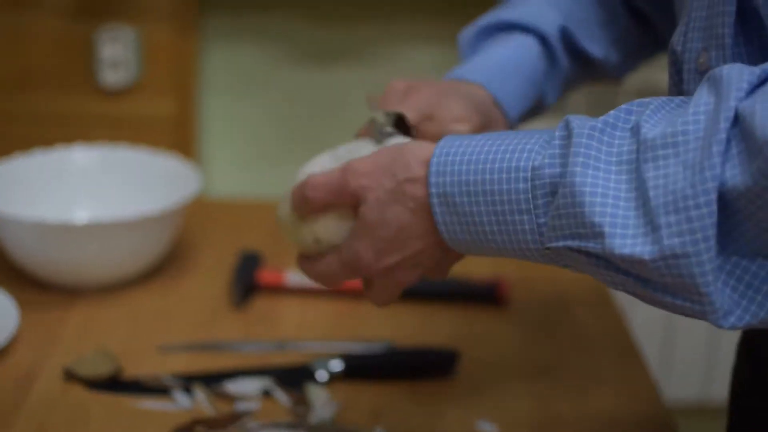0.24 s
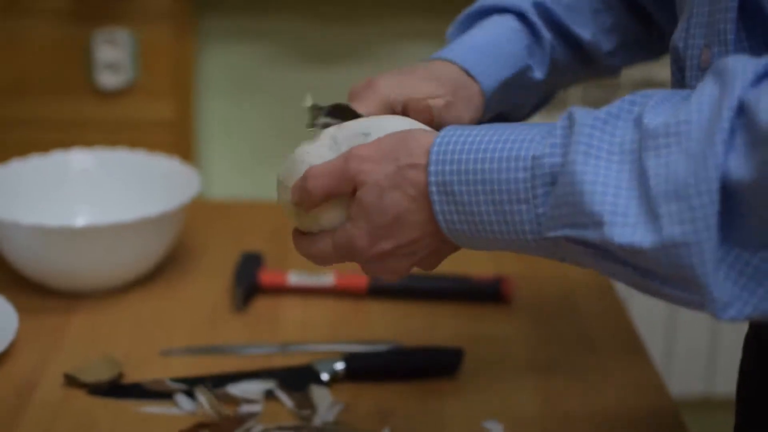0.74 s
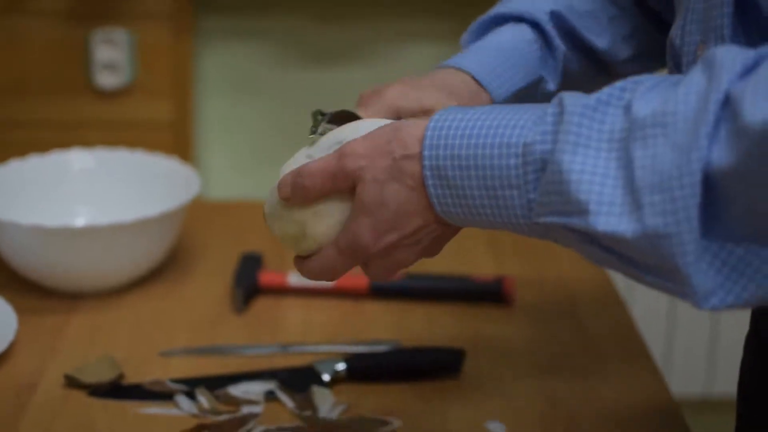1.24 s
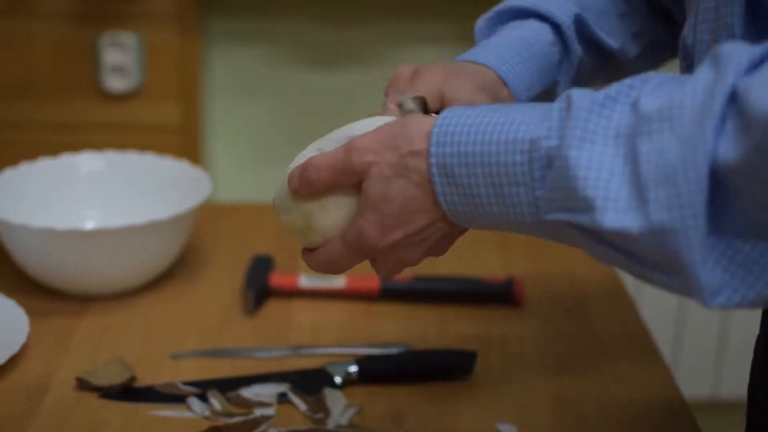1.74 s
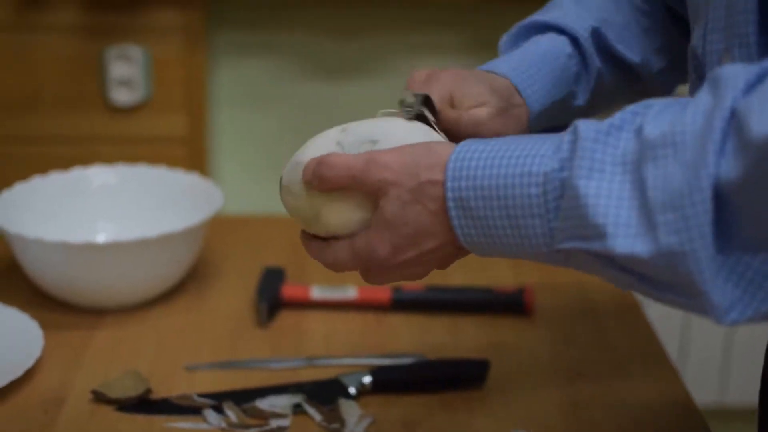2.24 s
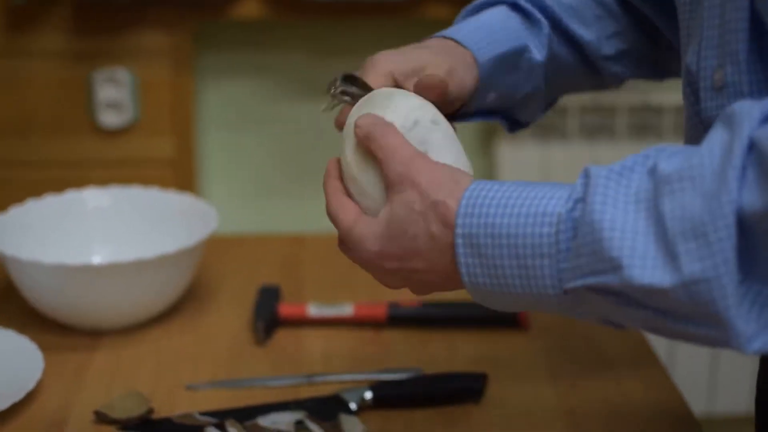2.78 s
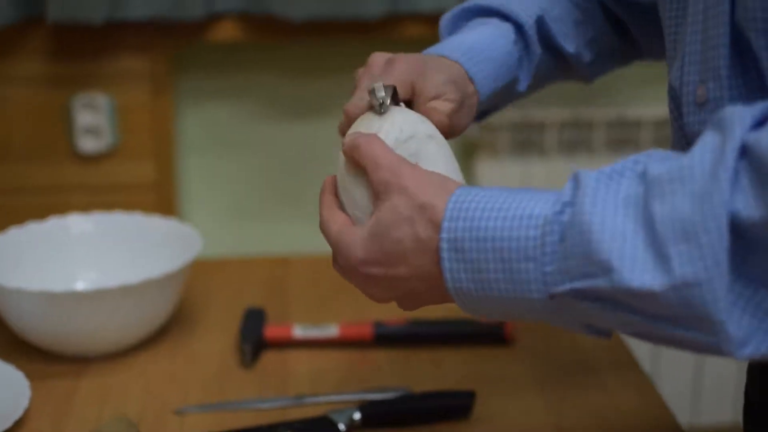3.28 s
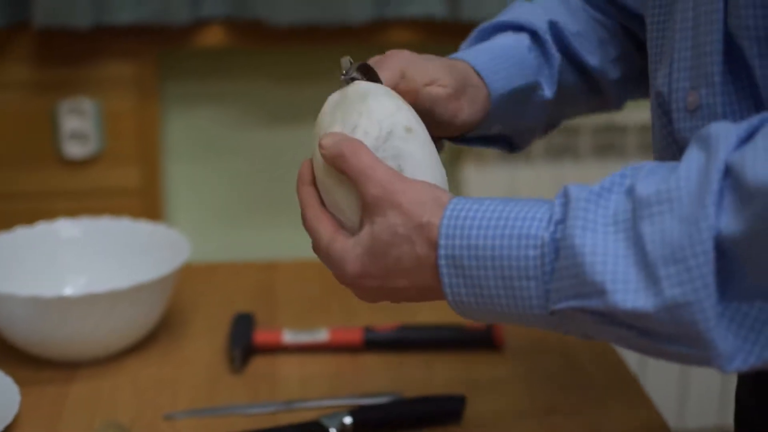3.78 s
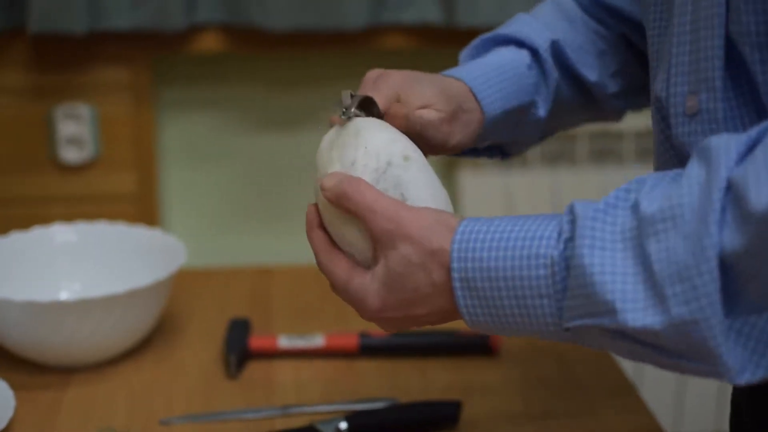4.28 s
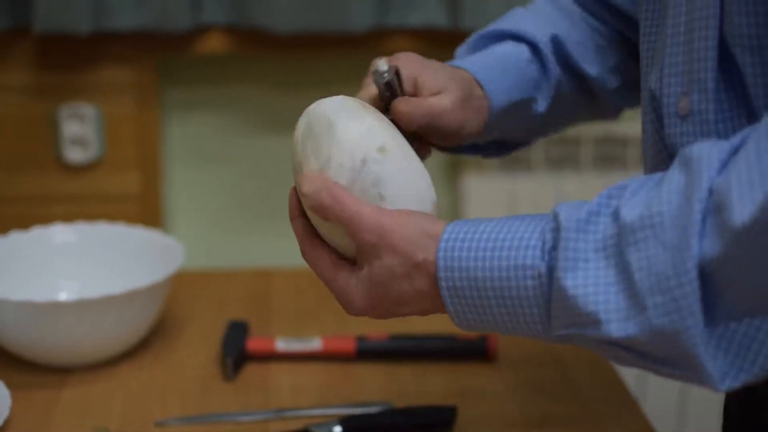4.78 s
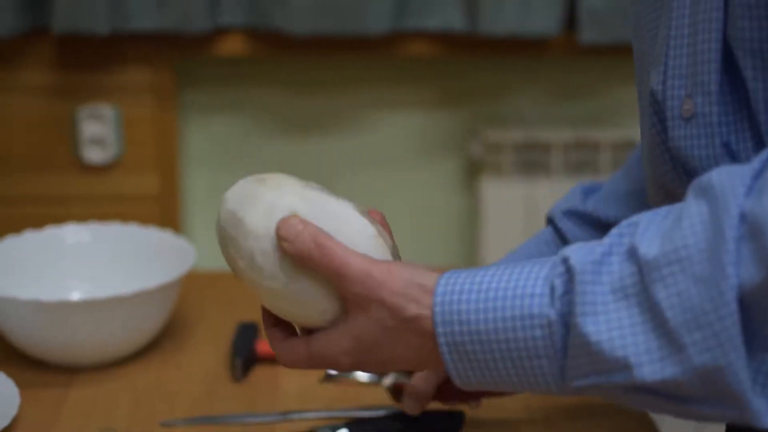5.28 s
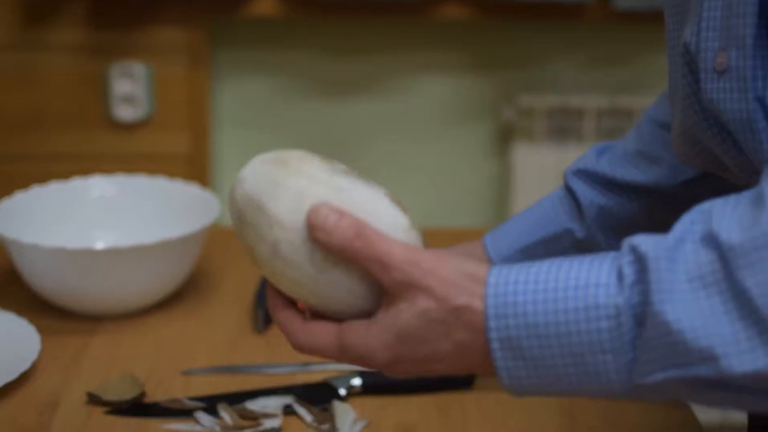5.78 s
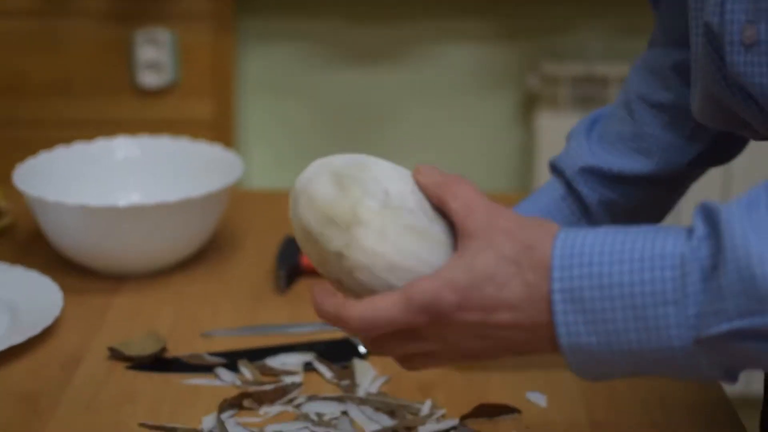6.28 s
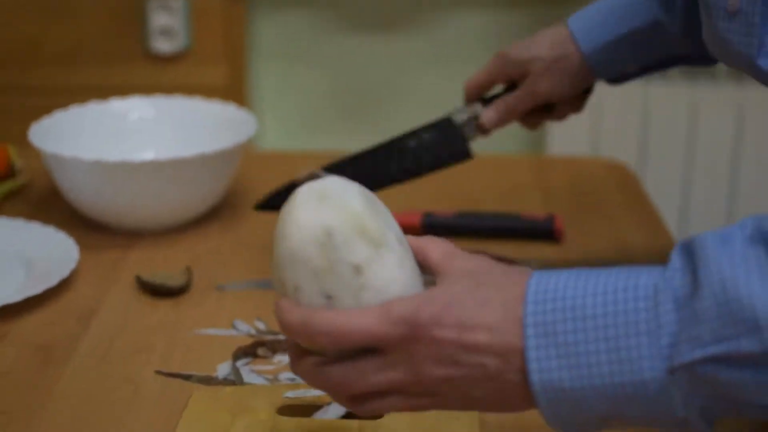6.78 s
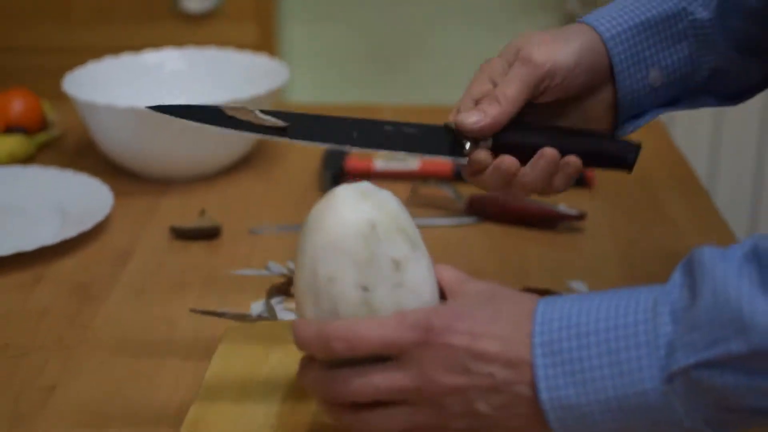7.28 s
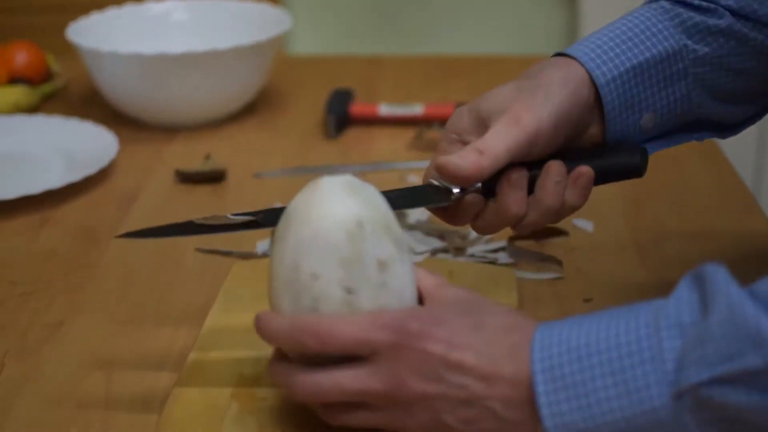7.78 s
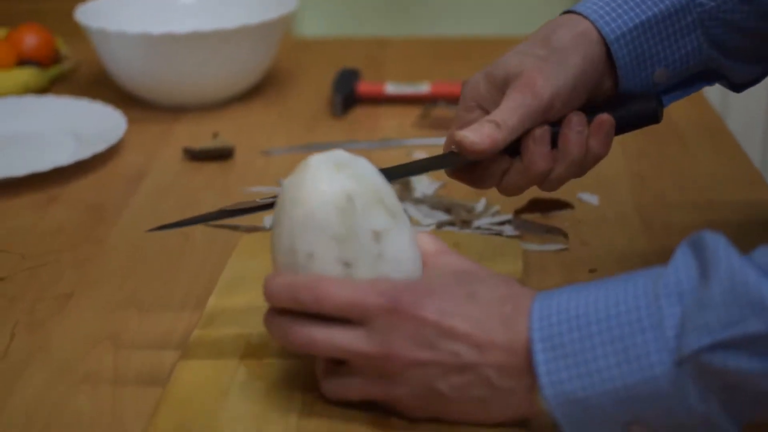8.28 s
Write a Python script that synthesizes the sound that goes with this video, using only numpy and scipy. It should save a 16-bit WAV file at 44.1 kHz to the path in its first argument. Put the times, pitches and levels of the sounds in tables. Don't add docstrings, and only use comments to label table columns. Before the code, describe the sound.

Close to the hands in a lively tiled kitchen, a swivel peeler shaves a coconut in short, uneven snicks, its loose blade ticking and jingling over the nut's hollow knock. After a brief lull, the tool is put down with hard wooden knocks, metallic clinks and a rough drag. Near quiet follows, then small knife touches over faint room air and refrigerator hum.

```python
import sys
import numpy as np
from scipy import signal
from scipy.io import wavfile

SR = 44100
rng = np.random.default_rng(int(sys.argv[2]) if len(sys.argv) > 2 else 0)


def voltage_ratio(decibels):
    exponent = np.asarray(decibels, float) / 20
    return 10 ** exponent


def master_out(mix):
    frames = np.transpose(np.atleast_2d(mix))
    ceiling = np.clip(frames, -1, 1)
    pcm = np.round(ceiling * 32767).astype(np.int16)
    wavfile.write(sys.argv[1], SR, pcm)


N = 376173

# start_s, level_db (bite), flesh_db (depth), loose_db (blade), length_s (rasp)
CUT_STROKES = [(0.0464, -34, -10.5, -6, 0.011), (0.1176, -18, -2.5, -4.5, 0.0054),
               (0.4544, -42.5, 3.5, -22, 0.022), (0.5394, -41.5, -8, -5, 0.019),
               (0.636, -27, -13.5, -5, 0.0074), (0.9403, -40, -1.5, -5.5, 0.037),
               (1.2254, -27.5, -0.5, -8.5, 0.019), (1.715, -20.5, -5.5, -8, 0.016),
               (2.0587, -27, -8.5, -7.5, 0.007), (2.2777, -40, -8, 2, 0.014),
               (2.6319, -41, -18, -7.5, 0.015), (2.8355, -44.5, 6, 2, 0.0091),
               (2.9357, -29, -6.5, 0.5, 0.012), (3.1867, -22, -1.5, -10.5, 0.023),
               (3.4181, -36, -9.5, 0.5, 0.055), (3.7035, -21.5, -9.5, -2, 0.0077),
               (4.0133, -36.5, -9, -7, 0.016), (4.1434, -34, -4.5, -1, 0.025),
               (4.7686, -18.5, -1, 0.5, 0.0042), (4.9337, -44.5, 4.5, 3.5, 0.034)]
CUT_THUD_DB, CUT_THUD_FOLLOWS = -11, 1.2
# start_s, level_db (rasp), flesh_db (depth), loose_db (blade), length_s (rasp)
BLADE_SLIDES = [(0.305, -41.5, -4.5, -4, 0.031), (0.443, -46, 0, -25, 0.015), (0.474, -37, -18, -4, 0.016),
                (0.747, -51, 7.5, 1.5, 0.17), (1.4055, -44, 5, 2.5, 0.037), (1.845, -35, -5.5, -2.5, 0.01),
                (2.12, -43.5, 0.5, -1.5, 0.049), (2.9134, -35.5, 2, -5, 0.0073),
                (3.381, -50.5, 13, 3, 0.025), (3.743, -40.5, 6, -23, 0.02), (3.9, -30.5, -6.5, 0, 0.025),
                (4.419, -31, -3.5, -3.5, 0.018), (4.59, -55, -6, -2, 0.02), (5.912, -35, 3, -15, 0.017),
                (7.108, -46.5, 3.8, -12, 0.078), (8.443, -58, 15, -20, 0.052)]
SLIDE_THUD_DB, SLIDE_THUD_FOLLOWS = -11, 1.0
# start_s, level_db, loose_db (blade)
BLADE_TICKS = [(0.212, -51, 3), (0.6427, -65, -6), (1.1, -52.5, 5), (1.1265, -42, 1.5), (1.58, -49.5, -5),
               (1.6428, -42.5, -1), (1.938, -47.5, 3), (2.431, -61, 5), (2.482, -61, 14.5),
               (3.051, -41.5, -0.5), (3.6401, -49, 0), (4.6548, -43.5, 1.5), (4.7045, -48, -2),
               (4.776, -35, 9.5), (4.5965, -53.5, 3.5), (0.031, -48, -6), (0.0568, -48, -7),
               (1.721, -48, -11), (2.898, -47, -4), (3.3952, -56, 5), (1.403, -50, -2), (1.417, -44, 3),
               (5.2773, -44.5, -2.5)]
TICK_THUD_DB, TICK_FLESH_DB, TICK_S = -17, -5.5, 0.015
# start_s, level_db (thud)
NUT_JOLTS = [
    (0.7903, -35.5),
    (3.1872, -29.5),
]
JOLT_EDGE_DB, JOLT_FLESH_DB, JOLT_JINGLE_DB, JOLT_S = -20, -15, 9, 0.0098
# start_s, level_db, thud_db, ring_db (blade)
KNIFE_TOUCHES = [
    (7.883, -34.5, -39, -12.5),
    (8.102, -34, -1.5, -32),
    (8.494, -35.5, -2.5, -32.5),
]
KNIFE_FLESH_DB, KNIFE_S = 0, 0.021

# pitch_hz, width_hz, level_db
COCONUT_MODES = [(414, 810, -6.5), (560, 310, 0), (740, 130, -6.5), (940, 150, 1.5), (1037, 240, 8.5)]
# pitch_hz, width_hz, level_db
FLESH_MODES = [(1350, 47, -5), (1710, 420, 3.5), (2040, 1200, 4), (3050, 400, -5.5)]
# pitch_hz, width_hz, level_db
EDGE_MODES = [(3170, 2450, 4), (3980, 2100, 4), (5440, 1200, -9), (6230, 650, -0.5)]
# pitch_hz, width_hz, level_db
BLADE_MODES = [(7140, 1100, 0.5), (8300, 160, -10), (9290, 780, 6), (10200, 280, -0.5), (11000, 290, -5),
               (12400, 590, -17), (13500, 1100, -5.5), (15000, 1200, -4)]
# pitch_hz, width_hz, level_db
JINGLE_MODES = [(3920, 50, -19), (6860, 31, -0.5), (7570, 200, -35), (8580, 230, 2.5), (9640, 370, 9),
                (10000, 270, -15), (10900, 160, -7), (12000, 100, 5.5), (12800, 110, -2.5)]
BODY_VARY_DB, METAL_VARY_DB = 1.6, 3.5

# start_s, level_db, length_s (under 0.002 counts as 0.002)
BLADE_RATTLES = [(0.474, -46, -0.15), (0.54, -50, -0.8), (1.127, -50, -0.3), (1.415, -39, -0.15),
                 (2.28, -52, -0.05), (2.94, -51, .03), (3.42, -38, .09), (3.905, -43, .06),
                 (4.015, -49.5, .03), (4.145, -47, -0.1), (4.77, -40, 0.1)]
# pitch_hz, width_hz, level_db
PIVOT_MODES = [(7070, 53, -4), (7800, 33, -12), (8350, 53, -17), (9350, 150, 0), (9630, 50, -5),
               (10100, 42, -11), (11100, 50, -4.5), (11700, 39, -3), (12000, 51, -7), (13000, 74, 0)]

# start_s, level_db, pitch_hz, length_s
HAND_THUMPS = [(0.453, -42, 750, 0.003), (0.787, -41.5, 179, 0.028), (0.787, -32, 330, 0.01),
               (.79, -30.5, 605, 0.017), (2.835, -48, 277, 0.015), (2.835, -40.5, 2220, 0.005),
               (3.186, -54, 147, 0.021), (3.185, -40, 327, 0.015), (3.186, -35.5, 610, 0.03),
               (3.749, -55.5, 180, 0.053), (3.745, -48.5, 495, 0.035), (5.681, -73, 64, 0.017),
               (3.5, -54, 920, 0.026), (5.778, -54.5, 374, 0.22), (6.018, -47, 151, 0.026),
               (6.212, -36, 283, 0.028), (6.272, -21.5, 744, 0.0053), (3.905, -48, 4050, 0.037),
               (6.214, -48.5, 127, 0.036), (2.8, -66, 45, .01), (0.788, -42, 820, .02),
               (0.119, -48.5, 610, .008), (2.634, -56, 750, 0.028), (4.77, -44.5, 600, 0.011),
               (3.418, -45, 4030, 0.048), (4.6, -50, 800, .02), (6.4, -29, 1220, 0.017),
               (6.5, -24.5, 715, 0.028)]
# start_s,
# level_db, pitch_hz, length_s
FLESH_SQUEAKS = [(0.204, -51, 2820, 0.083), (0.761, -49.5, 2860, 0.07), (1.227, -41, 1350, 0.0032),
                 (2.173, -54, 2600, 0.022), (1.716, -42, 1680, .015), (2.062, -47.5, 1420, 0.0086),
                 (2.059, -47, 3660, .006), (2.14, -58, 2880, 0.035), (2.28, -55.5, 3150, .02),
                 (2.9, -51.5, 2250, .04), (2.94, -47, 4500, .015), (4.425, -56, 2000, 0.016),
                 (4.77, -36.5, 3170, .03), (6.092, -33, 2330, .01), (0.455, -50, 3220, 0.076),
                 (3.641, -61.5, 1900, 0.035), (4.768, -32, 1710, 0.019), (6.328, -26.5, 2030, 0.022),
                 (6.473, -23, 1680, 0.0055), (7.884, -45.5, 1280, .02), (8.11, -37.5, 1650, 0.02),
                 (8.501, -40, 1710, 0.018)]
# start_s, level_db, pitch_hz, length_s
STEEL_CLINKS = [
    (1.229, -45, 6360, 0.0083),
    (1.413, -52, 11500, 0.018),
    (6.213, -36.5, 3270, 0.027),
    (6.262, -30, 3860, 0.024),
    (6.258, -33, 5380, 0.027),
    (6.254, -36, 7260, 0.028),
]
# start_s, level_db,
# pitch_hz, length_s
HOLLOW_NOTES = [(0.473, -60, 920, .004), (0.788, -43, 604, 0.012), (0.805, -46, 477, 0.011),
                (3.187, -31, 710, 0.0077), (3.205, -34, 623, 0.0035), (3.24, -43, 635, 0.014),
                (3.716, -42, 1940, 0.0071), (3.729, -48, 1850, 0.0073), (3.741, -46, 1730, 0.0071),
                (3.756, -43, 560, 0.0072), (3.774, -43, 540, 0.0089), (3.79, -59, 600, .006),
                (4.79, -49, 1700, 0.022), (6.018, -26.5, 2040, 0.006), (6.158, -25, 710, .003),
                (6.2115, -21, 760, 0.004), (6.222, -21.5, 700, 0.02), (6.257, -20.5, 1750, 0.01)]
THUMP_Q, SQUEAK_Q, CLINK_Q, NOTE_Q = 3.2, 4.5, 17.0, 6.6

# start_s, level_db
RUB_PRESSURE = [
    [(0.0, -46), (0.51, -56), (0.79, -50), (1.2, -63), (1.33, -43), (1.6, -62), (2.73, -85), (3.06, -58),
     (3.48, -55), (3.78, -68), (3.94, -52.5), (4.24, -46), (4.44, -98), (4.85, -46), (5.05, -60.5),
     (5.69, -88), (5.9, -71)],
    [(6.75, -57.5), (7.026, -70), (7.304, -59.5), (8.12, -68), (8.53, -63)],
]

# start_s, board_db, upper_wood_db, crack_db, length_s (rattle)
TABLE_KNOCKS = [(6.019, -16.5, 9.5, -3.5, 0.0031), (6.089, -18.5, 8, -25, 0.0038),
                (6.097, -19.5, 8.5, -28, 0.012), (6.118, -22.5, 9, -30, 0.0055),
                (6.139, -22, 11.5, -26, 0.029), (6.154, -23.5, 13, -66, 0.0041),
                (6.212, -10, 0.5, -0.5, 0.006), (6.257, -18, 13, 0, 0.0021), (6.324, -16.5, 11, -8, 0.0063),
                (6.333, -17, 6.5, -9, 0.0067), (6.355, -15.5, 9, -13, 0.0022),
                (6.378, -17.5, 7, -8, 0.0049), (6.391, -20, 1, -16, 0.0043), (6.408, -27, -3, -20, 0.0029),
                (6.431, -33, 7, -20, 0.004), (6.472, -28.5, 7, 1, 0.02), (6.493, -22.5, -6, -17, 0.0048),
                (6.519, -26, 11.5, -18, 0.0026), (6.547, -32, 8.5, -20, 0.0062),
                (6.532, -29, 8, -22, 0.0028), (6.055, -21.5, 4, -20, .004)]
# start_s, level_db, brightness_db
TOOL_DRAG = [
    (6.0, -50, -16),
    (6.016, -36.5, -50),
    (6.266, -24.5, -3),
    (6.312, -44, 20),
    (6.334, -16.5, -53),
    (6.454, -49, -27),
    (6.506, -23.5, -3),
    (6.62, -72, -4),
]
# pitch_hz, width_hz, level_db
BOARD_MODES = [(362, 21, -5), (496, 28, -8.5), (525, 62, -5.5), (661, 43, -1), (800, 69, 0),
               (862, 130, -2.5), (1028, 74, 0), (1110, 290, 2.5)]
# pitch_hz, width_hz, level_db
UPPER_WOOD_MODES = [(1242, 140, -12), (1417, 51, -13), (1570, 160, -15.5), (1774, 97, -10.5),
                    (2065, 150, -13), (2270, 680, -14.5), (2600, 450, -17)]
# start_s, pitch_hz, level_db, t60_s
METAL_CHINKS = [(6.019, 6665, -47, .8), (6.019, 7386, -46, .6), (6.019, 8737, -47, .35),
                (6.019, 10210, -47, .3), (6.019, 11630, -40, .15), (6.019, 13400, -50, .12),
                (6.05, 10640, -45, .3), (6.09, 12930, -46, .08), (6.158, 8419, -46, .3),
                (6.33, 8419, -47, .15), (6.34, 12930, -49, .1), (6.5, 12930, -49, .1),
                (6.5, 11630, -50, .15)]
RING_DB = -1

# pitch_hz, t60_s
KITCHEN_DECAY = [(200, 0.42), (700, 0.39), (2000, 0.38), (5000, 0.33), (10000, 0.26), (15000, 0.32)]
# pitch_hz, likeness (0 to 1)
ROOM_LIKENESS = [(200, 1), (1000, 1), (3000, 0.93), (8000, 0.71), (14000, 0.15)]
TAIL_TURN_S = 0.023
TABLE_WET_DB = -3.5

# pitch_hz, level_db (per Hz)
AIR_SPECTRUM = [(25, -37), (167, -19), (336, -9), (634, -6), (902, -7.5), (2000, -12), (9330, -29),
                (15200, -37.5)]
AIR_DB = -52
# pitch_hz, likeness (0 to 1)
AIR_LIKENESS = [(60, 0.41), (180, 0.76), (550, 0.94), (1650, 0.71), (4970, 0.24), (15000, 0.12)]
# pitch_hz, level_db (rms)
FRIDGE_HUM = [(586.8, -71), (635.2, -67), (775.2, -78.5), (2105, -68)]
HUM_SWELL_DB, HUM_SWELL_FROM_S, HUM_SWELL_S = 4.5, 6.44, 0.81
BAND_EDGES = 25 * 2 ** np.arange(0, 9.6, .5)


def rms_one(x):
    return x / np.sqrt(np.mean(x ** 2) + 1e-20)


def at_hz(points, hz):
    points = np.array(points)
    return np.interp(np.log(hz), np.log(points[:, 0]), points[:, 1])


def in_time(rows, column=1):
    rows = np.array(rows)
    return voltage_ratio(np.interp(np.arange(N) / SR, rows[:, 0], rows[:, column], left=-150, right=-150))


def band(x, low_hz, high_hz):
    return signal.sosfilt(signal.butter(2, [low_hz, high_hz], "band", fs=SR, output="sos"), x + 1e-18)


def resonate(x, hz, width_hz):
    r = np.exp(-np.pi * width_hz / SR)
    zeros = np.sqrt((1 - r * r) / 2) * np.array([1, 0, -1])
    poles = [1, -2 * r * np.cos(2 * np.pi * hz / SR), r * r]
    return signal.lfilter(zeros, poles, x + 1e-18)


def grains(per_s, spread_db):
    sizes = voltage_ratio(spread_db * np.minimum(rng.exponential(1, N), 5)) * rng.choice([-1, 1], N)
    return rms_one(sizes * (rng.random(N) < per_s / SR))


def contacts(times, lengths, levels_db, modes, rough, bite, rise_s, vary_db):
    t, out = np.arange(SR // 5) / SR, np.zeros(N)
    first = round((min(times) - rise_s) * SR)
    last = min(round(max(times) * SR) + SR // 4, N)
    chance = rng.standard_normal((len(times), len(modes)))
    swell = 1 - np.exp(-(t / rise_s) ** 2)
    rasps = [swell * np.exp(-(t / (rise_s + max(length, .002))) ** 1.62) for length in lengths]
    for k, (hz, width_hz, db) in enumerate(modes):
        force, clicks = np.zeros((2, last - first + len(t)))
        for s, rasp, level_db, luck in zip(times, rasps, levels_db, chance[:, k]):
            gain = voltage_ratio(level_db + db + vary_db * luck)
            force[round((s - rise_s / 2) * SR) - first:][:len(t)] += gain * rasp
            clicks[round(s * SR) - first] += gain * bite
        texture = rough[np.arange(first, last) - 977 * k]
        drive = force[:last - first] * texture + clicks[:last - first]
        out[first:last] += (-1) ** k * resonate(drive, hz, width_hz)
    lowest, highest = modes[0][0], modes[-1][0]
    out[first:last] = band(out[first:last], 0.58 * lowest, min(1.75 * highest, 19000))
    return out


def with_thud(rows, thud_db, follows):
    return [(s, db, thud_db + follows * depth, depth, loose, length) for s, db, depth, loose, length in rows]


def bites():
    cuts = with_thud(CUT_STROKES, CUT_THUD_DB, CUT_THUD_FOLLOWS)
    ticks = [(s, db, TICK_THUD_DB, TICK_FLESH_DB, loose, TICK_S) for s, db, loose in BLADE_TICKS]
    jolts = [(s, db + JOLT_EDGE_DB, -JOLT_EDGE_DB, JOLT_FLESH_DB, JOLT_JINGLE_DB, JOLT_S)
             for s, db in NUT_JOLTS]
    knife = [(s, db, thud, KNIFE_FLESH_DB, ring, KNIFE_S) for s, db, thud, ring in KNIFE_TOUCHES]
    return cuts + ticks + jolts + knife


def blade_on_coconut(rows, grit_per_s, bite, rise_s):
    s, db, thud, flesh, jingle, length = np.transpose(rows)
    fibres = voltage_ratio(2.5 * rms_one(band(rng.standard_normal(N), 40, 250)))
    grit = rms_one(fibres * grains(grit_per_s, spread_db=3.0))
    pressure = grains(20000, spread_db=-2.0)
    out = contacts(s, length, db + thud - 11.0, COCONUT_MODES, pressure, bite, rise_s, BODY_VARY_DB)
    out += contacts(s, length, db + flesh - 16.5, FLESH_MODES, pressure, bite, rise_s, BODY_VARY_DB)
    out += contacts(s, length, db - 17.5, EDGE_MODES, grit, bite, rise_s, BODY_VARY_DB)
    out += contacts(s, length, db + jingle - 17, BLADE_MODES, grit, bite, rise_s, METAL_VARY_DB)
    out += contacts(s, 0.34 * length, db + jingle - 20.0, JINGLE_MODES, grit, bite, rise_s, METAL_VARY_DB)
    return out


def rattling():
    s, db, length = np.transpose(BLADE_RATTLES)
    chatter = grains(900, spread_db=4.5)
    return contacts(s, length, db - 13.0, PIVOT_MODES, chatter, bite=8.9, rise_s=0.0027,
                    vary_db=METAL_VARY_DB)


def bumps():
    grit, out = grains(18000, spread_db=3.0), np.zeros(N)
    kinds = [(HAND_THUMPS, THUMP_Q), (FLESH_SQUEAKS, SQUEAK_Q), (STEEL_CLINKS, CLINK_Q), (HOLLOW_NOTES, NOTE_Q)]
    for rows, q in kinds:
        for s, db, hz, length in rows:
            out += contacts([s], [length], [db], [(hz, hz / q, 0)], grit, bite=19.5, rise_s=0.0026, vary_db=1)
    return out


def rubbing():
    crackle = grains(8000, spread_db=5.0) + 0.5 * grains(460, spread_db=-10.0)
    pressure = sum(in_time(rows) for rows in RUB_PRESSURE)
    return voltage_ratio(-9.0) * pressure * rms_one(band(crackle, 520, 9800))


def table():
    s, db, upper, crack, length = np.transpose(TABLE_KNOCKS)
    grit = grains(15000, spread_db=1.5)
    wood = contacts(s, length, db - 11.5, BOARD_MODES, grit, bite=13.9, rise_s=0.0004, vary_db=BODY_VARY_DB)
    wood += contacts(s, length, db + upper - 9.0, UPPER_WOOD_MODES, grit, bite=18.0, rise_s=0.0025,
                     vary_db=BODY_VARY_DB)
    wood += contacts(s, length, db + crack - 24.5, EDGE_MODES + BLADE_MODES[:5], grit, bite=3.5,
                     rise_s=0.0032, vary_db=METAL_VARY_DB)
    chatter = band(in_time(TOOL_DRAG) * grains(1300, spread_db=2.5), 190, 15000)
    modes = BOARD_MODES + UPPER_WOOD_MODES
    wood += voltage_ratio(-18.0) * sum(voltage_ratio(db) * resonate(chatter, hz, width) for hz, width, db in modes)
    wood += voltage_ratio(-14.0) * band(chatter * in_time(TOOL_DRAG, column=2), 2300, 13400)
    return wood + voltage_ratio(RING_DB) * rings()


def rings():
    t, out = np.arange(SR // 2) / SR, np.zeros(N)
    for s, hz, db, t60 in METAL_CHINKS:
        out[round(s * SR):][:len(t)] += voltage_ratio(db - 60 * t / t60) * np.sin(2 * np.pi * hz * t)
    return out


def stereo_bands(count, gain, likeness):
    out, white = 0, rng.standard_normal((2, 2, count))
    for k, (low, high) in enumerate(zip(BAND_EDGES, BAND_EDGES[1:])):
        mid, side = band(white[k % 2], low, high)
        hz = np.sqrt(low * high)
        alike = np.clip(at_hz(likeness, hz), 0, 1)
        out = out + gain(hz) * (np.sqrt(1 + alike) * mid + np.sqrt(1 - alike) * side * [[1], [-1]])
    return out


def kitchen(x, sent, echo_s, echo_db, wet_db, count=4):
    t = np.arange(int(.7 * SR)) / SR
    out = voltage_ratio(np.array([[-.4], [.4]])) * x + voltage_ratio(echo_db) * np.roll(x, round(echo_s * SR))
    turn = np.arange(N) / SR / TAIL_TURN_S
    for k in range(count):
        tail = stereo_bands(len(t), lambda hz: voltage_ratio(-60 * t / at_hz(KITCHEN_DECAY, hz)), ROOM_LIKENESS)
        tail = tail * np.clip((t - .0055) / 0.00096, 0, 1)
        tail = voltage_ratio(wet_db) * tail / np.sqrt(np.sum(tail ** 2) / 2)
        share = np.cos(np.pi / 2 * np.minimum(np.abs((turn - k) % count - count / 2), 1))
        out += signal.oaconvolve((share * sent)[None], tail, axes=1)[:, :N]
    return out


def background():
    t = np.arange(N) / SR
    air = stereo_bands(N, lambda hz: voltage_ratio(at_hz(AIR_SPECTRUM, hz)), AIR_LIKENESS)
    air = voltage_ratio(AIR_DB - 2.0) * rms_one(air)
    swell_db = HUM_SWELL_DB * np.clip((t - HUM_SWELL_FROM_S) / HUM_SWELL_S, 0, 1)
    for hz, db in FRIDGE_HUM:
        waver = rms_one(resonate(rng.standard_normal(N), hz, width_hz=6.4))
        line = 1.3 * np.sin(2 * np.pi * hz * t) + 0.63 * waver
        air += voltage_ratio(db + swell_db * (hz < 1000)) * line
    return air


def scene():
    slides = with_thud(BLADE_SLIDES, SLIDE_THUD_DB, SLIDE_THUD_FOLLOWS)
    near = blade_on_coconut(bites(), grit_per_s=12000, bite=5.5, rise_s=0.002)
    near += blade_on_coconut(slides, grit_per_s=7900, bite=0, rise_s=0.018)
    near += rattling() + bumps() + rubbing()
    wood = voltage_ratio(1.5) * table()
    sent = near + voltage_ratio(TABLE_WET_DB) * wood
    return kitchen(near + wood, sent, echo_s=0.0065, echo_db=-14.5, wet_db=-0.5) + background()


def top_cut(x):
    return signal.sosfilt(signal.butter(12, 16830, fs=SR, output="sos"), x)


def record(dry):
    soft = signal.sosfilt(signal.butter(4, 14800.0, fs=SR, output="sos"), dry)
    soft = signal.sosfilt(signal.cheby2(10, 50, 17100, fs=SR, output="sos"), soft)
    treble = signal.lfilter(*signal.butter(1, 5000.0, "high", fs=SR), soft)
    mix = soft * voltage_ratio(np.array([[-.15], [.15]])) + 0.05 * treble * [[-1], [1]]
    return top_cut(mix)


dry = scene()
out = record(dry)
master_out(out)
```